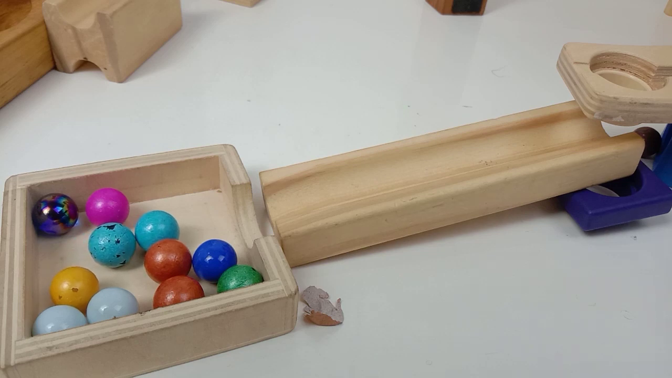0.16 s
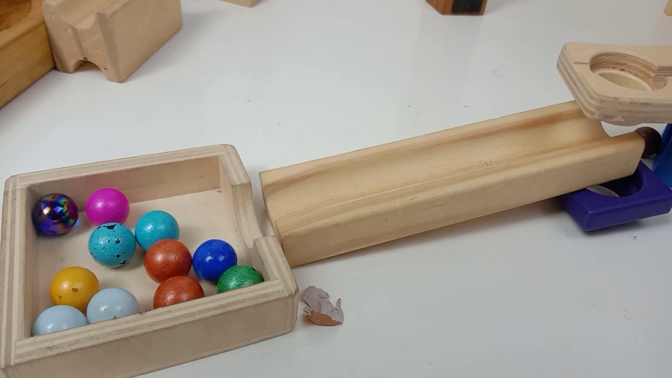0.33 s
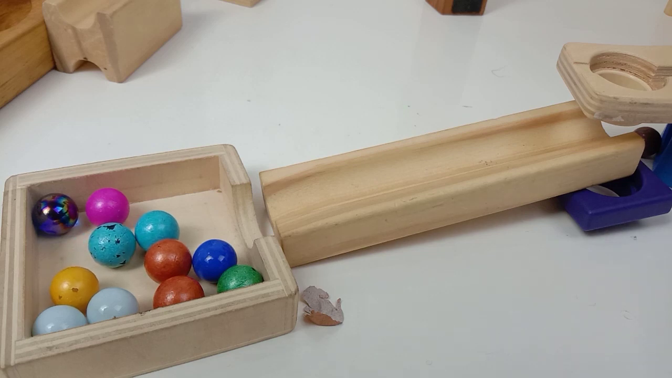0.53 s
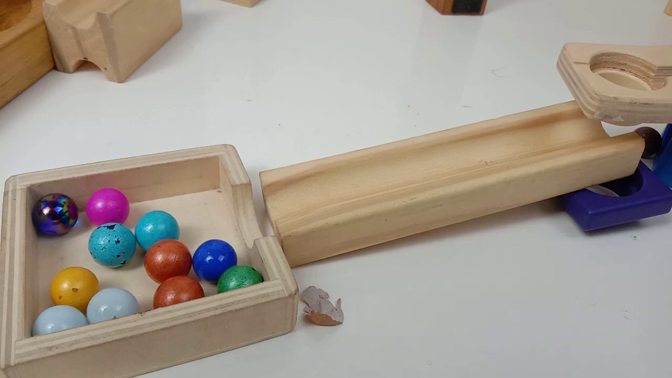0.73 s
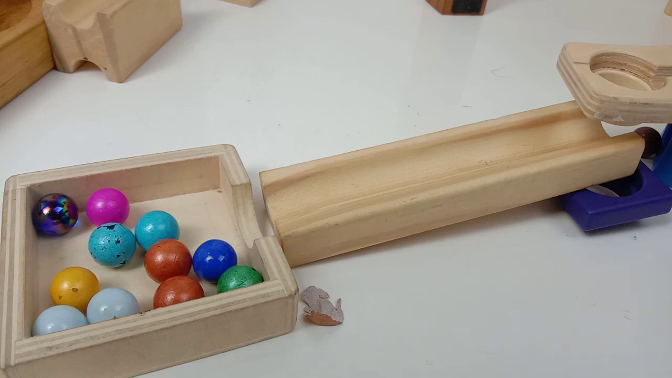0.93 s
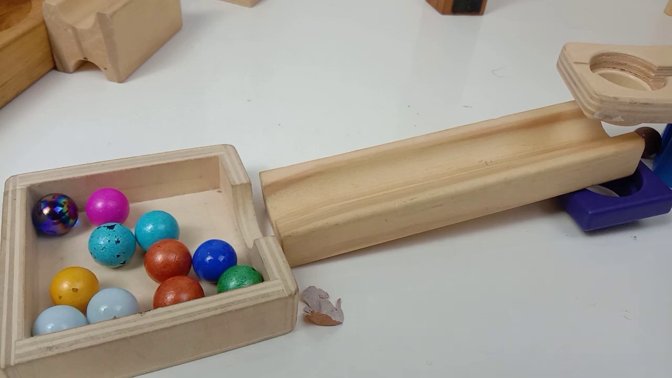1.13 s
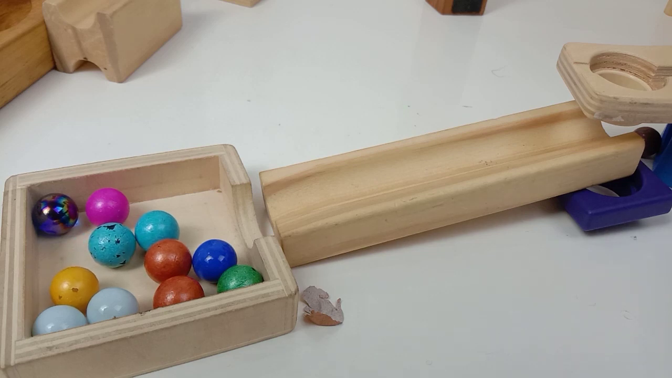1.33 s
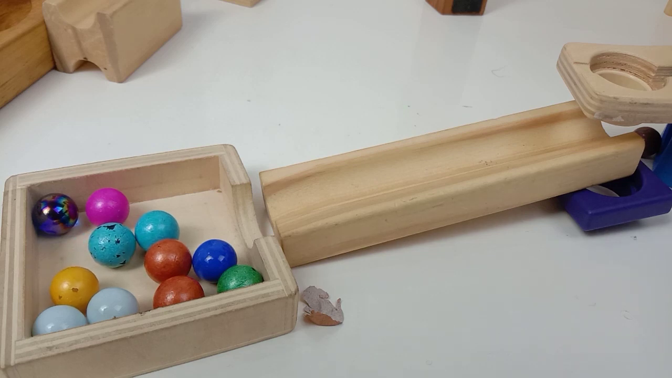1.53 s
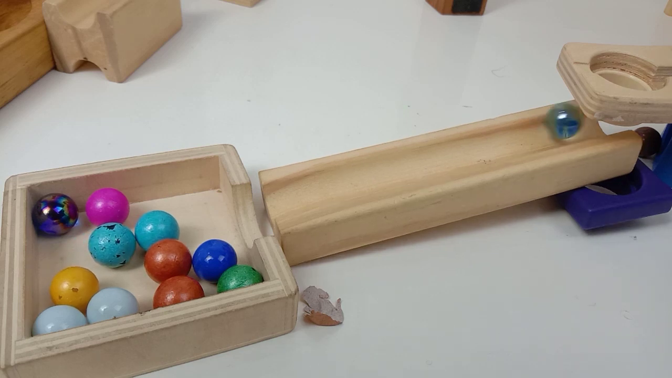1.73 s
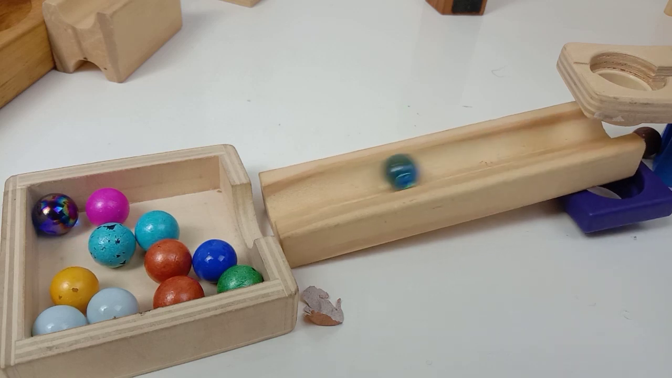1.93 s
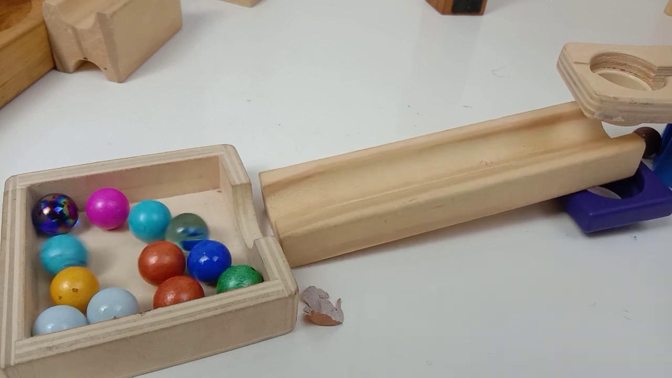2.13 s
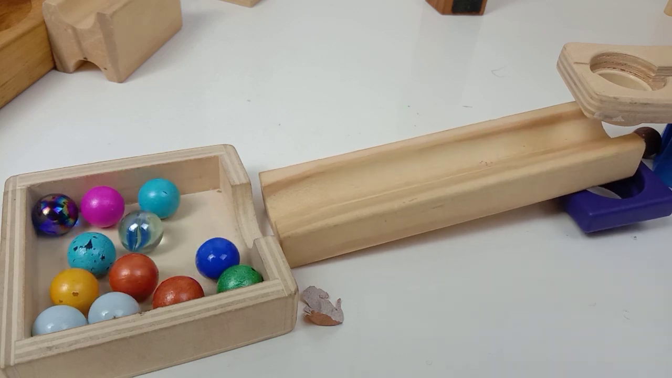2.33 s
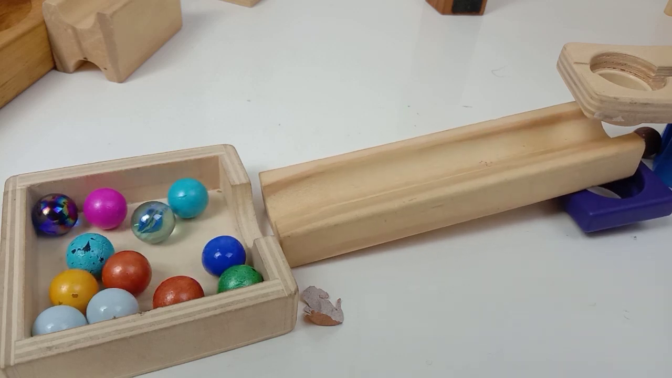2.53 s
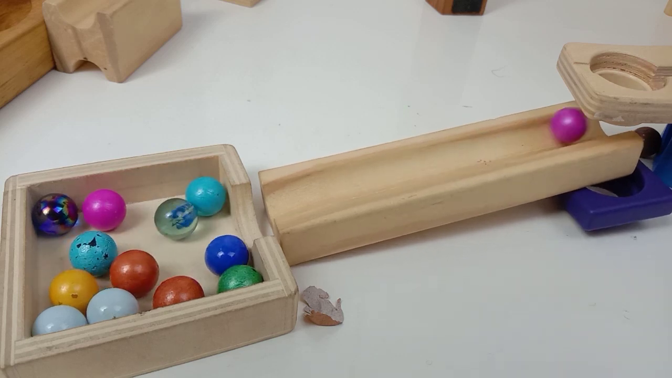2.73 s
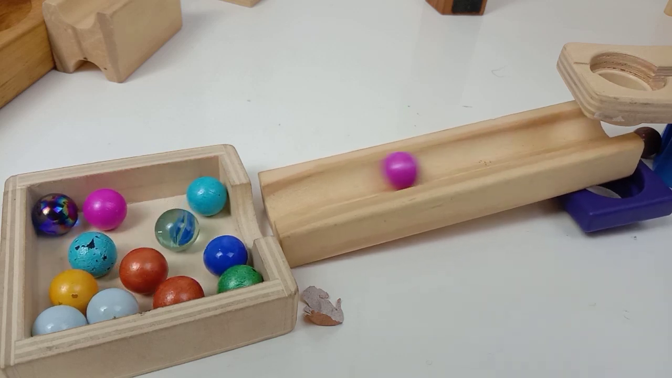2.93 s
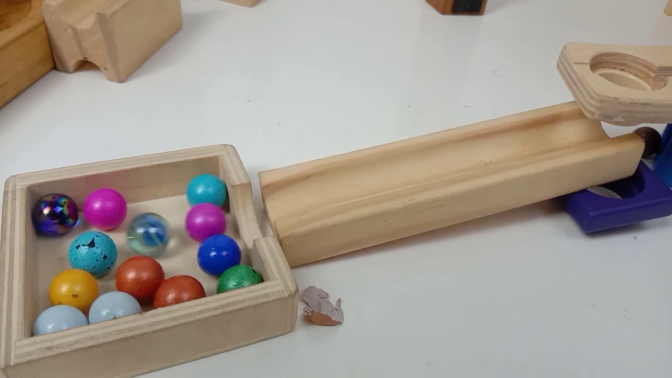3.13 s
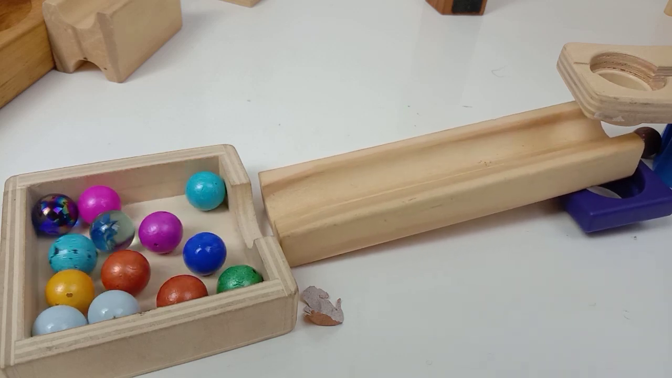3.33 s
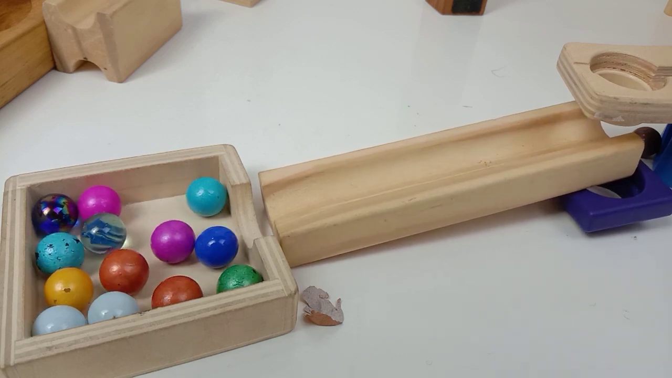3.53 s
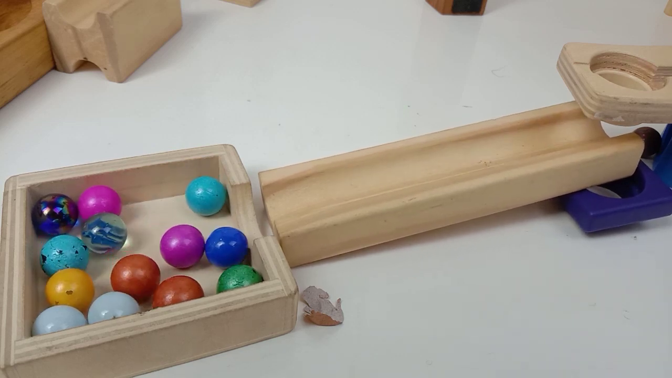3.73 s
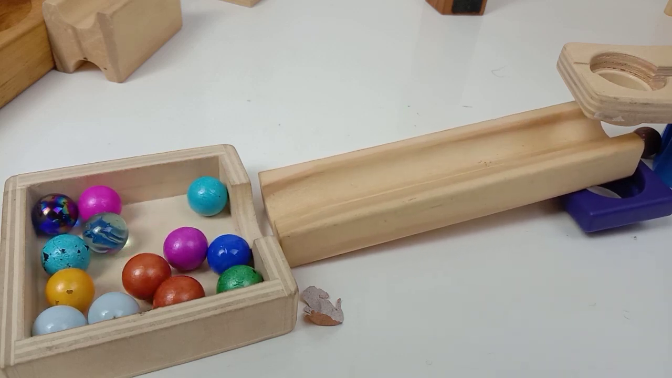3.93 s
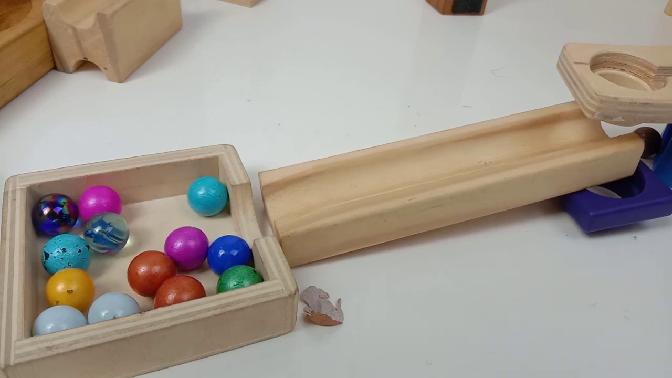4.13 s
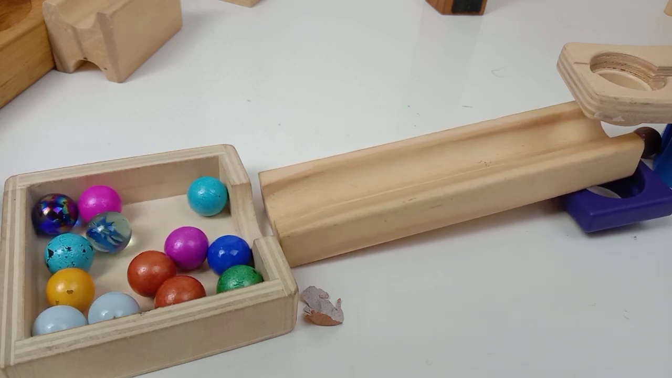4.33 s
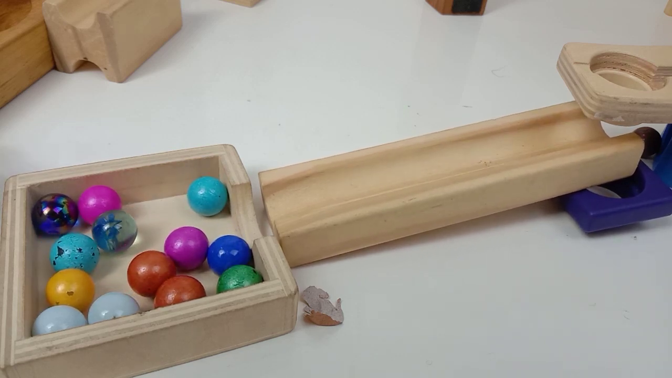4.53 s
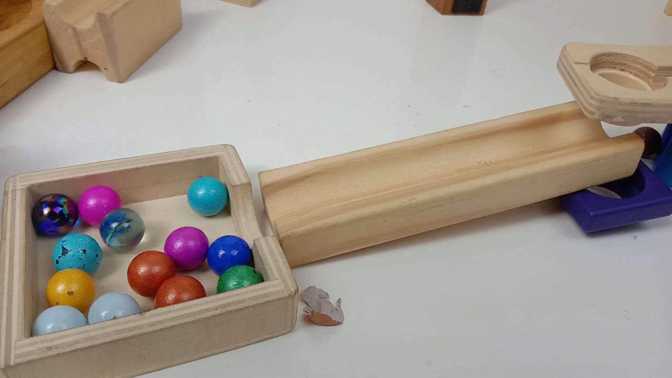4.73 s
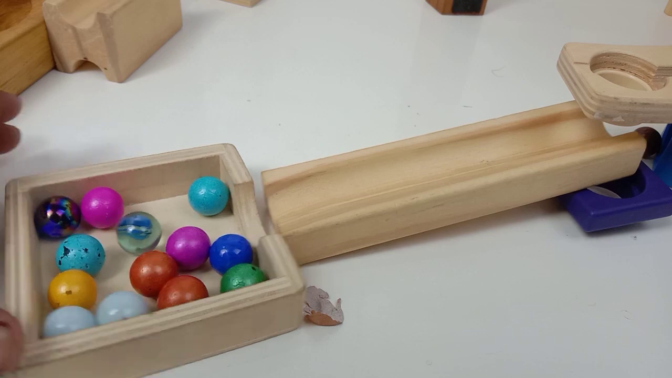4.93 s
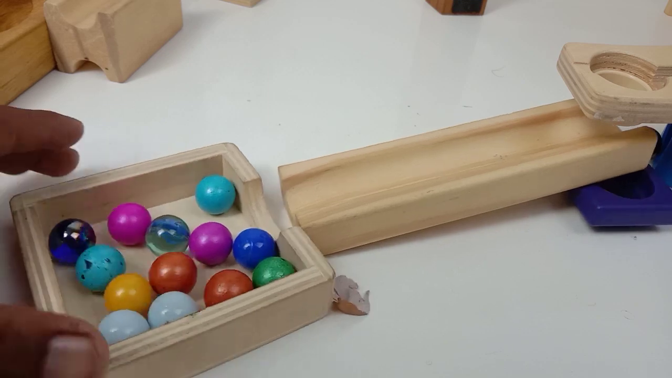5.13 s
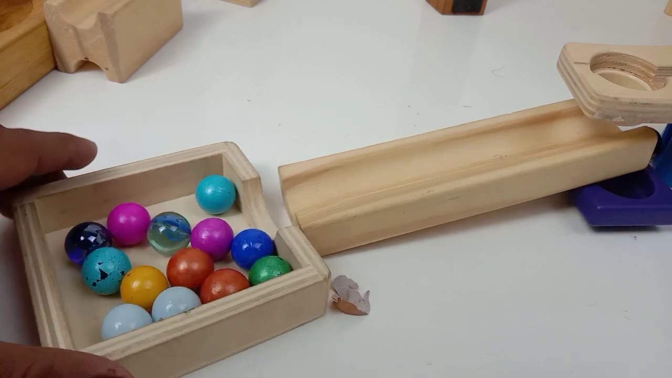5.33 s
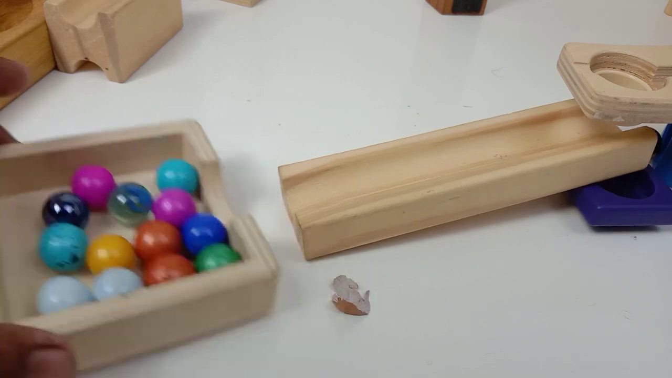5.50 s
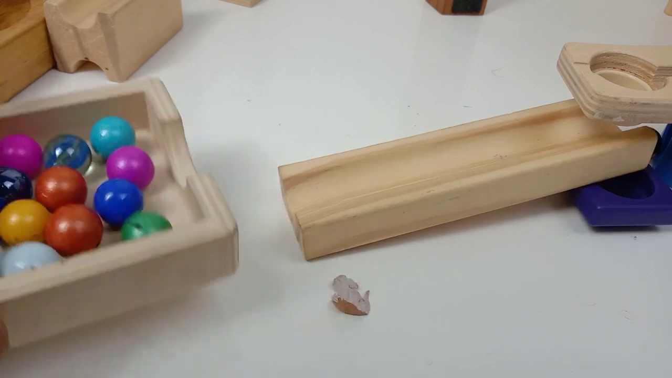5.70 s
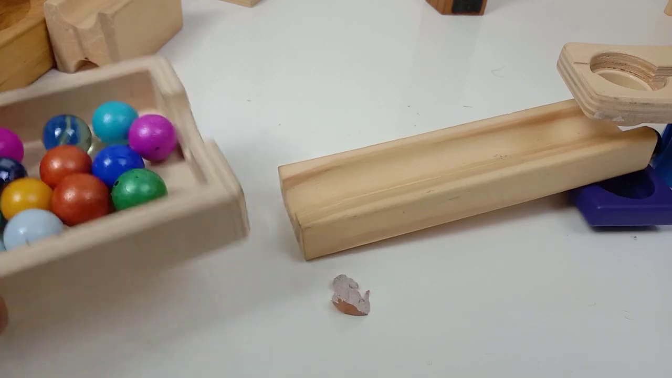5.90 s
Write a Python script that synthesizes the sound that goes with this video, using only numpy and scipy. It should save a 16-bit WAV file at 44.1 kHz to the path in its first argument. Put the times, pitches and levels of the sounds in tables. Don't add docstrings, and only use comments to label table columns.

```python
import sys
import numpy as np
from scipy import signal
from scipy.fft import rfft, irfft
from scipy.io import wavfile
from scipy.ndimage import uniform_filter1d

SR = 44100
rng = np.random.default_rng(int(sys.argv[2]) if len(sys.argv) > 2 else 0)


def volts(x):
    e = np.asarray(x, float) / 20
    return 10 ** e


def store_wav(level_fs):
    pcm = np.round(np.clip(np.atleast_2d(level_fs), -1, 1) * 32767)
    wavfile.write(sys.argv[1], SR, pcm.T.astype(np.int16))


N = 267246

# frequency in Hz, level in dB.
FLOOR_SPECTRUM = [(25, -37), (97, -2.5), (197, -17.5), (640, -25.5), (2400, -34), (7110, -39.5),
                  (12500, -49), (15300, -38)]

# time in s, knock peak in dB, table thump in dB, clack in dB, crack in dB.
TRACK_HITS = [
    (0.4777, -9, -26.5, -15, -11.5),
    (0.522, -16, -24, -30.5, -30),
    (1.332, -9, -20, -15.5, -19),
    (1.361, -15, -38, -36, -34.5),
    (1.4, -21, -50, -57, -75),
    (2.6621, -27.5, -45.5, -42.5, -36),
]
# frequency in Hz, level in dB, decay t60 in s.
TRACK_MODES = [(350, -17, 0.041), (424, -9, 0.074), (497, -12.5, 0.045), (552, -7, .04), (667, -2.5, 0.073),
               (797, -6.5, 0.025), (872, -3, 0.044), (1015, -4.5, 0.05), (1070, -3.5, 0.039),
               (1256, -3.5, 0.025), (1334, -2.5, 0.033), (1404, -8, 0.028), (1730, -14, 0.028),
               (1850, -14.5, .02)]
# frequency in Hz, level in dB, decay t60 in s.
TABLE_MODES = [(92, -13.5, .1), (123, -5.5, 0.27), (178.5, -15.5, 0.12), (226, -4, 0.09), (246.7, -1, 0.13),
               (302, -9, .06), (344, -10, 0.057), (415.6, -1, 0.14)]
# frequency in Hz, level in dB, decay t60 in s.
TRACK_SLOW_MODES = [(360.6, -9, 0.28), (2290, -8, 0.077), (2410, -12.5, 0.1), (2770, -10, 0.076),
                    (3800, -17.5, .08), (4050, -16.5, 0.064), (5030, -17, .16), (5120, -15, 0.11),
                    (5260, -15.5, 0.078), (6094, -10.5, .08), (6277, -15.5, 0.18), (7170, -17.5, 0.11)]

# time in s, peak in dB.
JOINTS = [(1.037, -52), (1.1672, -42.5), (1.2062, -37), (1.499, -34.5), (1.552, -35), (1.597, -36),
          (2.0144, -42), (2.364, -31.5), (2.3952, -33), (2.4702, -40), (2.5084, -40), (2.5645, -31)]
# frequency in Hz, level in dB, decay t60 in s.
ROLL_UPPER_MODES = [(1180, -12, 0.047), (1250, 3.5, 0.027), (1395, -7, 0.03), (1770, -14, 0.04),
                    (1960, -19, .04), (2400, -22, .03)]
# frequency in Hz, level in dB, decay t60 in s.
ROLL_MODES = [(406.5, -5.5, 0.071), (537, -10.5, 0.02), (653, 2, 0.052), (760, -10, 0.012),
              (827, -2.5, 0.037), (1090, -12.5, 0.14)]
# start in s, length in s, first level in dB, last level
# in dB, brightness in dB.
TRACK_RUNS = [
    (1.045, 0.049, -44.5, -45.5, -21.5),
    (1.176, 0.12, -44.5, -40, -7.5),
    (1.369, 0.18, -45, -43.5, -5),
    (1.548, 0.034, -42, -45, 6.5),
    (2.042, 0.56, -46.5, -43.5, -2),
    (3.087, 0.16, -56, -44, 7),
]
# start in s, length in s, first level in dB, last level in dB, brightness in dB.
CHUTE_RUNS = [
    (1.76, 0.097, -42.5, -39.5, -2),
    (1.95, 0.079, -51, -48, -27.5),
    (2.76, 0.12, -35.5, -47, -12),
    (2.95, 0.084, -46, -49.5, -20.5),
]
# frequency in Hz, level in dB, decay t60 in s.
CHUTE_SONG_MODES = [(2800, 0.5, .08), (2870, -5.5, .05), (4850, -9, .06), (6490, -11.5, .05)]

# time in s, knock peak in dB, table thump in dB, clack in dB, crack in dB.
CHUTE_HITS = [
    (1.6974, -4.5, -23, -9.5, -23.5),
    (1.8544, -32, -35.5, -28.5, -48.5),
    (2.717, -5, -20.5, -1.5, -1),
    (2.866, -45, -42, -30, -51),
    (2.947, -28, -36, -74.5, -84.5),
    (3.0453, -17, -30.5, -23, -36),
]
# frequency in Hz, level in dB, decay t60 in s.
CHUTE_MODES = [(615, -29, 0.033), (670, 1, 0.016), (816, 1.5, 0.11), (995, -11, 0.2), (1235.7, -2, 0.15),
               (1490, -16.5, 0.082), (1656, -20.5, 0.063)]
# frequency in Hz, level in dB, decay t60 in s.
CHUTE_STIFF_MODES = [(2830, -3, .16), (2806, -11, .07), (2858, -9, .09), (2890, -11, .05), (3040, -12, .04),
                     (3430, -18, .05), (3779, -14, .04)]
# frequency in Hz, level in dB, decay t60 in s.
CHUTE_TOP_MODES = [(4802, -1, .14), (4760, -7, .08), (4870, -6, .08), (5230, -15, .05), (6490, -1, .1),
                   (6950, -6, .09), (7327, -9, .08)]

# time in s, knock peak in dB, table thump in dB, hardness in dB.
TRAY_HITS = [(2.0574, -12, -36, -1), (2.0975, -16.5, -32, -3.5), (2.1018, -22, -41, -25),
             (2.121, -16.5, -54.5, -10), (2.144, -20.5, -49, 13), (2.163, -25, -35, -8),
             (2.177, -25, -52, -2.5), (2.277, -24, -49, -1), (2.416, -36, -40, -38), (3.076, -20, -45, 3),
             (3.079, -5, -40, -17), (3.097, -39.5, -53, 24), (3.1209, -20, -24, 0),
             (3.126, -15.5, -31, -31), (3.146, -19, -59, -23), (3.171, -23, -58, -13),
             (3.213, -23.5, -54, -2), (3.422, -38.5, -55.5, -22.5), (3.577, -47, -74.5, -37.5),
             (3.642, -50, -62, -26.5), (3.772, -67, -52.5, 1.5), (4.06, -38.5, -39, -23.5),
             (4.09, -71.5, -64.5, 7), (4.241, -72, -41.5, 2), (4.922, -38.5, -38.5, 0),
             (4.931, -27.5, -44, -14), (4.935, -35, -35, -22), (4.977, -26, -38, -15),
             (4.985, -18, -21, -39), (4.992, -40, -32.5, -10), (4.995, -23, -31.5, -25),
             (5.051, -29.5, -36, -7.5), (5.096, -25, -41, -11), (5.238, -43, -73, -34),
             (5.283, -39, -60, -27), (5.367, -43.5, -68, -51), (5.388, -36, -49, -34)]
# frequency in Hz, level in dB, decay t60 in s.
TRAY_MODES = [(574, -19.5, 0.018), (698, -14, 0.045), (850, -10, 0.03), (1030, -6.5, .025),
              (1235.5, -7, 0.039), (1278, -2.5, 0.053), (1610, -10.5, 0.0083), (1850, -10.5, 0.024)]
# time in s, peak in dB, pitch in Hz.
TICKS = [(2.0825, -10, 7440), (2.0907, -2, 5300), (2.162, -16.5, 7000), (2.2253, -25, 7900),
         (2.2436, -21, 7780), (2.284, -11.5, 7050), (2.4177, -26, 6960), (3.103, 1.5, 7640),
         (3.163, -20, 6240), (3.1889, -11.5, 7700), (3.2317, -13.5, 6300), (3.2367, -14, 7800),
         (3.243, -21, 5800), (3.2622, -32, 6760), (3.4692, -27, 7060), (3.6664, -36, 7980),
         (3.7767, -29.5, 9900),
         (4.9214, -16, 7680), (4.9602, -11.5, 6000), (5.0574, -22, 7000), (5.1116, -20, 8500),
                (5.1234, -23, 7010), (5.1407, -23, 7500), (5.1715, -28.5, 6830), (5.216, -26, 6700),
                (5.225, -30, 6200), (5.2812, -40, 7000), (5.3019, -24.5, 7340), (5.306, -25, 7200),
                (5.329, -24.5, 7600), (5.3804, -34, 6500), (5.384, -25, 7000), (5.406, -38, 5950),
                (5.4545, -19.5, 7000), (5.463, -25, 7000), (5.5054, -14, 7200), (5.5239, -10.5, 7700),
                (5.5724, -16, 6100), (5.6153, -12, 7800), (5.7805, -17.5, 5900), (5.8604, -9, 7060),
                (5.8806, -19, 7300), (5.8982, -12, 6760), (5.9546, -7, 7500), (5.9684, -17, 7300),
                (5.9915, -26, 9000), (6.0121, -21, 7200)]

# start in s, length in s, first level in dB, last level in dB.
SCUFFS = [
    (3.752, 0.013, -59, -64),
    (3.772, 0.0052, -37.5, -28.5),
    (3.785, 0.048, -70, -77),
    (3.94, 0.095, -61, -70),
    (4.09, 0.029, -67, -67),
]
# frequency in Hz, width in Hz, level in dB.
SCUFF_BANDS = [(2130, 310, 0.5), (4510, 1400, -5.5), (6250, 470, 2), (8110, 270, -1.5), (9200, 460, 6),
               (10500, 600, 11.5), (12700, 520, 4)]
# start in s, length in s, first push in dB, last push in dB, woodiness in dB.
NUDGES = [
    (3.786, 0.078, -47, -54.5, -18.5),
    (3.925, 0.087, -53.5, -64, -10),
    (4.083, .04, -39, -50.5, -25),
    (4.242, 0.013, -34.5, -41.5, -32.5),
    (4.944, 0.042, -37.5, -35.5, -13),
    (5.01, 0.107, -51, -53, 8),
    (5.291, 0.026, -59, -63.5, 8.5),
    (5.377, 0.035, -62, -68, 4),
    (5.434, 0.022, -65, -51, 7),
    (5.601, 0.053, -53.5, -48, -13),
]
# start in s, length in s, first level in dB, last level in dB.
ROCKS = [
    (3.79, 0.11, -72, -74),
    (3.93, 0.11, -66.5, -66.5),
    (4.08, 0.031, -63.5, -60.5),
    (4.22, 0.1, -61, -64.5),
    (4.34, 0.033, -75, -75.5),
    (4.49, 0.046, -68, -57),
    (4.81, 0.038, -62.5, -64),
]
# frequency in Hz, width in Hz, level in dB.
RUB_BANDS = [(2930, 170, -10.5), (3550, 140, 0), (4030, 83, -2), (4700, 78, -3), (5950, 170, -3.5),
             (7340, 230, -8.5), (7800, 78, -3.5), (8460, 90, -10), (9300, 120, -9.5)]
# time in s, level in dB.
JOSTLE = [
    (4.9, -49.5),
    (5.05, -50.5),
    (5.1, -55),
    (5.322, -99),
    (5.412, -53),
    (5.638, -61),
    (5.71, -22),
    (6.06, -28.5),
]
# start in s, length in s, first level in dB, last level in dB,
# hum in Hz.
CREEPS = [(3.817, 0.039, -70, -61, 670), (3.82, .06, -73, -73, 1630), (3.952, 0.13, -69, -64, 1610),
          (3.966, 0.136, -62, -59, 657), (4.093, 0.087, -65, -69, 750), (4.935, .008, -29, -37, 779),
          (4.984, 0.013, -27.5, -23, 825), (4.99, 0.021, -28, -35, 434), (5.102, .006, -40, -34.5, 850),
          (5.116, 0.039, -44, -51.5, 1250), (5.11, 0.029, -45, -53, 760)]

# time in s, knock peak in dB, walls in dB, crack in dB, pitch in Hz.
LIFTED_HITS = [(5.443, -28.5, -60, -39.5, 1830), (5.448, -27, -44, -43, 1780),
               (5.474, -22, -27.5, -59, 2150), (5.493, -16.5, -49, -23.5, 2170),
               (5.508, -17.5, -45, -24, 2200), (5.56, -4.5, -12, -24.5, 1610), (5.574, -29, -39, -38, 1940),
               (5.609, -9, -32, -35, 1830), (5.617, -23, -34, -23, 1500), (5.65, -3, -22.5, -60, 1740),
               (5.6598, -6, -11, -24, 2150), (5.664, 3, -12, -12.5, 1430), (5.668, 1, -16, -25, 1520),
               (5.677, -17, -28, -16.5, 1590), (5.707, -5, -4.5, -15, 1910), (5.711, -3, -33, -36, 1420),
               (5.723, -28, -15, -20, 1500), (5.802, -12, -18.5, -46, 1660), (5.814, -10, -26, -23, 1680),
               (5.819, -14, -27, -39, 1720), (5.837, -11, -9, -26, 1520), (5.844, -11.5, -30, -48, 1480),
               (5.851, -18, -36, -40, 1410), (5.69, -15, -27, -47, 1700), (5.907, -8, -23, -49, 1330),
               (5.92, 6.5, -7, -21, 1310), (5.925, 2, -12, -38, 1350), (5.934, -14, -25, -47, 1520),
               (5.946, -17, -15, -28.5, 1500), (5.976, -9.5, -31, -34, 1400), (5.998, -5, -11, -36, 1950),
               (6.016, -6.5, -13, -35, 1420), (6.023, 6.5, -17.5, -17, 1330),
               (6.036, -19, -1.5, -15.5, 1430), (6.037, 3, -22, -20, 1410), (6.044, -4, -20, -29, 1430),
               (6.049, -9, -8, -31, 1430)]
# frequency in Hz, level in dB, decay t60 in s.
LIFTED_MODES = [(1200, -11, .012), (1354, -5, .016), (1430, -2, .018), (1510, -4, .012), (1615, -4, .012),
                (1783, -2, .018), (1900, -4, .012), (2150, -2, .018)]
# frequency in Hz, level in dB, decay t60 in s.
LIFTED_WALL_MODES = [(2550, -8.5, 0.0073), (2900, -3, 0.01), (2970, -1.5, 0.012), (3600, -23, 0.063),
                     (4500, -5, 0.012)]

# frequency in Hz, decay t60 in s.
ROOM_T60 = [(100, 0.54), (260, 0.39), (700, 0.25), (1840, 0.28), (4850, 0.28), (12800, 0.24)]
# frequency in Hz, width in Hz, added gain as a factor.
HOUSING = [(1250, 80, .7), (7300, 1000, 1.3)]


def rms_one(x):
    return x / np.sqrt(np.mean(x ** 2) + 1e-20)


def at_hz(points, hz):
    known_hz, values = np.transpose(points)
    return np.interp(np.log(hz + 1), np.log(known_hz), values)


def ring(clicks, hz, t60):
    r = volts(-60 / (t60 * SR))
    w = 2 * np.pi * hz / SR
    return signal.lfilter([0, np.sin(w)], [1, -2 * r * np.cos(w), r * r], clicks + 1e-18)


def stir(contact, modes, t60_scale=1):
    return sum(volts(db) * ring(contact, hz, t60_scale * t60) for hz, db, t60 in modes)


def resonance(x, hz, width_hz):
    r = np.exp(-np.pi * width_hz / SR)
    zeros = np.array([1, 0, -1]) * (1 - r * r) / 2
    return signal.lfilter(zeros, [1, -2 * r * np.cos(2 * np.pi * hz / SR), r * r], x)


def band(x, low_hz, high_hz):
    sos = signal.butter(2, [low_hz, min(high_hz, .45 * SR)], "band", fs=SR, output="sos")
    return signal.sosfilt(sos, x)


def clicks_at(seconds, sizes):
    out = np.zeros(N)
    places = np.round(np.asarray(seconds) * SR).astype(int)
    np.add.at(out, np.clip(places, 0, N - 1), sizes)
    return out


def strike(seconds, peak_db, modes, contact_hz, spread_db=3, smear_s=.0012, near_hz=None):
    luck = rng.standard_normal((len(seconds), len(modes), 2))
    late = smear_s * rng.random((len(seconds), len(modes)))
    out = np.zeros(N)
    for k, (hz, db, t60) in enumerate(modes):
        level_db = peak_db + db + spread_db * luck[:, k, 0]
        if near_hz is not None:
            level_db = level_db - 23 * np.abs(np.log2(hz / near_hz))
        sizes = volts(level_db) * np.sign(luck[:, k, 1])
        out += ring(clicks_at(seconds + late[:, k], sizes), hz, t60)
    return signal.sosfilt(signal.butter(4, contact_hz, fs=SR, output="sos"), out)


def burst(seconds, peak_db, t60, low_hz, high_hz):
    decay = volts(-60 / (t60 * SR))
    fade = signal.lfilter([1], [1, -decay], clicks_at(seconds, volts(peak_db)) + 1e-18)
    return band(fade * rng.standard_normal(N), low_hz, high_hz)


def grains(per_s, spread_db):
    sizes = volts(spread_db * np.minimum(rng.exponential(1, N), 5)) * rng.choice([-1, 1], N)
    return rms_one(sizes * (rng.random(N) < per_s / SR))


def drift(rate_hz):
    knots = rng.standard_normal(400)
    return np.interp(np.arange(N) / SR * rate_hz, np.arange(400), knots)


def strokes(rows, rise_db_s, fall_db_s):
    t = np.arange(0, N, 8) / SR
    gains = []
    for start, length, first, last, *_ in rows:
        level_db = np.interp(t, [start, start + length], [first, last])
        before, after = np.maximum(start - t, 0), np.maximum(t - start - length, 0)
        gains.append(volts(level_db - rise_db_s * before - fall_db_s * after))
    return np.repeat(gains, 8, axis=1)[:, :N]


def floor():
    shape = volts(at_hz(FLOOR_SPECTRUM, np.arange(N // 2 + 1) * SR / N))
    noise = volts(-66) * rms_one(irfft(rfft(rng.standard_normal(N)) * shape, N))
    return noise + 1.7 * resonance(noise, 1250, 55)


def knocks(hits, modes, body_db, clack_db, thump_db, crack_db, snap_db, contact_top_hz):
    s, peak, low, clack, high = np.transpose(hits)[:5]
    body = strike(s, peak + body_db, modes, contact_hz=2300)
    thump = strike(s + 0.0017, low + thump_db, TABLE_MODES, contact_hz=700)
    contact = burst(s, clack + clack_db - 2.5, 0.0052, 950, contact_top_hz)
    crack = burst(s, high + crack_db, 0.00075, 3300, 9300)
    snap = band(clicks_at(s, -volts(clack + snap_db)), 1500, contact_top_hz)
    snap = band(snap, 880, contact_top_hz)
    return body + thump + contact + crack + snap + burst(s, clack + clack_db, 0.019, 1600, 4000)


def track_knocks():
    return knocks(TRACK_HITS, TRACK_MODES, body_db=-4.5, clack_db=10.5, thump_db=-9.5, crack_db=7.5,
                  snap_db=3.5, contact_top_hz=6500)


def track_ringing():
    s, clack = np.transpose(TRACK_HITS)[[0, 3]]
    return strike(s, clack - 8, TRACK_SLOW_MODES, contact_hz=9000, spread_db=1.0)


def room(x):
    t = np.arange(SR // 2) / SR
    white = rng.standard_normal((2, len(t)))
    edges = 50 * 2 ** np.arange(0, 8.6, .5)
    tail = np.zeros(len(t))
    for k, (low, high) in enumerate(zip(edges, edges[1:])):
        t60 = at_hz(ROOM_T60, np.sqrt(low * high))
        tail += band(white[k % 2], low, high) * volts(-60 * t / t60)
    tail = tail * (1 - np.exp(-t / 0.00048))
    return volts(-9) * signal.fftconvolve(x, tail / np.sqrt(np.sum(tail ** 2)))[:N]


def joints():
    s, db = np.transpose(JOINTS)
    bumps = strike(s, db - 5.5, ROLL_UPPER_MODES, contact_hz=1900, smear_s=0.0066)
    return bumps + burst(s, db - 24, .05, 1100, 2400)


def rolling():
    rise_db_s, fall_db_s = 305.5, 598
    on_track = strokes(TRACK_RUNS, rise_db_s, fall_db_s)
    on_chute = strokes(CHUTE_RUNS, rise_db_s, fall_db_s)
    rim_gain = volts(np.array(TRACK_RUNS)[:, 4]) @ on_track + volts(np.array(CHUTE_RUNS)[:, 4]) @ on_chute
    on_track, on_chute = on_track.sum(axis=0), on_chute.sum(axis=0)
    table_gain = volts(-14) * on_track + volts(13.5) * on_chute
    deep_gain = volts(-8.5) * on_track + volts(-15) * on_chute

    lumps = grains(2000, 3.0) * volts(3.5 * drift(30))
    wood = band(band(stir(lumps, ROLL_MODES), 400, 1400), 400, 1400)
    rim = band(band(stir(lumps, ROLL_UPPER_MODES), 1100, 1900), 1000, 2100)
    below = stir(lumps, TABLE_MODES)
    table = band(band(below, 180, 540), 190, 560)
    deep = band(below, 110, 190)
    song = stir(lumps, CHUTE_SONG_MODES)

    out = volts(-0.5) * (on_track + on_chute) * rms_one(wood)
    out = out + volts(-6.5) * rim_gain * volts(6.8 * drift(22)) * rms_one(rim)
    out = out + volts(-7.5) * table_gain * rms_one(table)
    out = out + volts(-1.5) * deep_gain * rms_one(deep)
    return out + volts(-20) * on_chute * rms_one(song)


def chute_knocks():
    return knocks(CHUTE_HITS, CHUTE_MODES, body_db=-11.5, clack_db=7.0, thump_db=-0.5, crack_db=-1.0,
                  snap_db=9.0, contact_top_hz=3620)


def chute_ringing():
    s, clack, high = np.transpose(CHUTE_HITS)[[0, 3, 4]]
    stiff = strike(s, 0.91 * clack - 5, CHUTE_STIFF_MODES, contact_hz=8900, spread_db=5.5, smear_s=0.00033)
    top = strike(s, high - 9, CHUTE_TOP_MODES, contact_hz=8500, spread_db=1.5)
    return stiff + top + burst(s, high - 5, 0.08, 2900, 5000) + burst(s, high - 23, 0.46, 2200, 7500)


def tray_knocks():
    hits = []
    for s, db, low, hard in TRAY_HITS:
        clack = db - 5.5 + 0.78 * hard
        hits.append((s, db, low, clack, db + hard))
    return knocks(hits, TRAY_MODES, body_db=-3, clack_db=14.0, thump_db=-4.5, crack_db=0.0,
                  snap_db=12.5, contact_top_hz=7000)


def ticks():
    t = np.arange(300) / SR
    s, db, hz = np.transpose(TICKS)
    echoes = burst(s, db - 4, 0.02, 4900, 10500)
    sheen = burst(s, 1.9 * db - 3, 0.011, 12000, 18000)
    out = echoes + sheen
    envelope = volts(-60 * t / 0.001) * (1.0 - np.exp(-t / 0.00005))
    for i, gain, w in zip(np.round(s * SR).astype(int), volts(db + 7), 2 * np.pi * hz):
        out[i:i + 300] += gain * np.sin(w * t) * envelope
    return band(band(out, 3800, 21000), 3200, 19000)


def scuffs():
    contact = grains(8100, 2.2)
    bands = sum(volts(db) * resonance(contact, hz, width) for hz, width, db in SCUFF_BANDS)
    return strokes(SCUFFS, 2500, 2200).sum(axis=0) * rms_one(bands)


def handling():
    contact = grains(5500, 0.47)
    knocking = grains(1500, 3.5)
    rub = np.zeros(N)
    for hz, width, db in RUB_BANDS:
        narrow = resonance(resonance(contact, hz, 0.69 * width), hz, 4 * width)
        rub += volts(db + 4.9 * drift(11)) * narrow
    rock_gain = strokes(ROCKS, 1200, 598.5).sum(axis=0)
    jostle_s, jostle_db = np.transpose(JOSTLE)
    jostle_gain = volts(np.interp(np.arange(N) / SR, jostle_s, jostle_db, left=-120))
    jostle = band(band(knocking, 2700, 9000), 2500, 10000)

    push = strokes(NUDGES, 1489, 505)
    low_gain = push.sum(axis=0)
    wood_gain = volts(6.5 * drift(45)) * (volts(np.array(NUDGES)[:, 4]) @ push)
    deep = stir(contact, TABLE_MODES[2:], t60_scale=0.5)
    deep = resonance(deep, 197.4, 38) + 0.11 * resonance(deep, 350, 61)
    woody = band(stir(contact, TRAY_MODES), 560, 1100)

    out = volts(-1.5) * rock_gain * rms_one(rub) + volts(-14.5) * jostle_gain * rms_one(jostle)
    out = out + volts(-3.5) * low_gain * rms_one(deep) + volts(-4.0) * wood_gain * rms_one(woody)
    return out + volts(-7.5) * wood_gain * rms_one(band(knocking, 460, 2000))


def creeps():
    contact = grains(3000, 3.8)
    out = np.zeros(N)
    for gain, (*_, hz) in zip(strokes(CREEPS, 1600, 1300), CREEPS):
        width_hz = hz / 7.7
        hum = resonance(resonance(contact, hz, width_hz), hz, width_hz)
        out += gain * rms_one(hum)
    return out


def shoves():
    grab_s = 4.9
    s, db = np.transpose([row[:2] for row in TRAY_HITS if row[0] > grab_s])
    pushes = strike(s, db - 11.5, TRAY_MODES, contact_hz=2614, smear_s=0.00396)
    return pushes + burst(s + 0.0014, db + 2, 0.055, 410, 1600)


def rattle():
    s, peak, walls, high, pitch = np.transpose(LIFTED_HITS)
    body = strike(s, peak - 5, LIFTED_MODES, contact_hz=3047, spread_db=5.5, smear_s=0.00055, near_hz=pitch)
    body = body + strike(s, walls - 3, LIFTED_WALL_MODES, contact_hz=5860, spread_db=8.0)
    body = body + burst(s, walls + 3, 0.019, 1340, 4400) + burst(s, high + 6, 0.034, 3300, 11000)
    no_bass = signal.butter(5, 1150, "high", fs=SR, output="sos")
    return signal.sosfilt(no_bass, body) + burst(s, peak - 22, 0.012, 533, 630)


def microphone(x):
    peak = resonance(resonance(x, 15100, 1300), 15100, 1300)
    x = x + sum(gain * resonance(x, hz, width) for hz, width, gain in HOUSING)
    x = x - 0.8 * resonance(x, 6640, 400)
    leak = band(x, 11000, 14500)
    return band(band(x, 70, 7150), 86, 7800) - volts(-4.5) * peak + volts(-26) * leak


def scene():
    far = track_knocks() + track_ringing() + joints() + rolling() + chute_knocks() + chute_ringing()
    near = tray_knocks() + ticks() + scuffs() + handling() + creeps() + shoves() + rattle()
    far_extra_db = 6
    sound = far + near + room(volts(far_extra_db) * far + near)
    return (microphone(sound) + floor())[None]


def roll_off(x):
    return signal.sosfilt(signal.butter(12, 16780, fs=SR, output="sos"), x)


def record(dry):
    knee_db, squeeze, release_db_s = -15, 0.7, 117.5
    level_db = 10 * np.log10(uniform_filter1d(dry[0] ** 2, size=132) + 1e-12)
    climb = release_db_s * np.arange(N) / SR
    held_db = np.maximum.accumulate(level_db + climb) - climb
    cut_db = uniform_filter1d(squeeze * np.maximum(held_db - knee_db, 0), size=66)
    rounded = .9 * np.tanh(dry * volts(-cut_db) / .9)
    top_limit = signal.ellip(8, 1, 30, 15700, fs=SR, output="sos")
    return roll_off(signal.sosfilt(top_limit, rounded))


dry = scene()
out = record(dry)
store_wav(out)
```